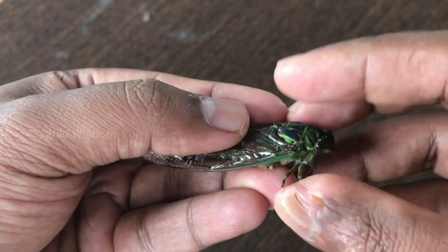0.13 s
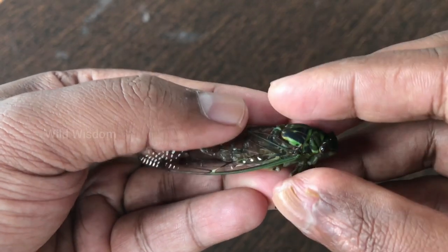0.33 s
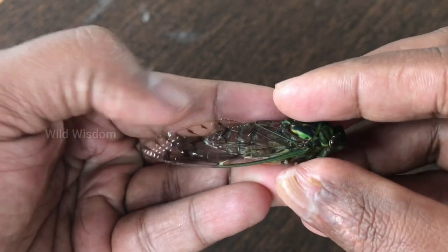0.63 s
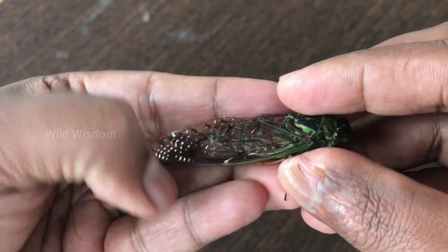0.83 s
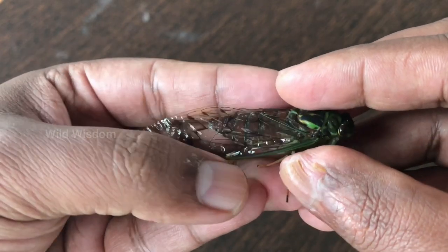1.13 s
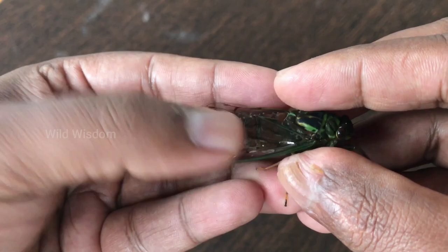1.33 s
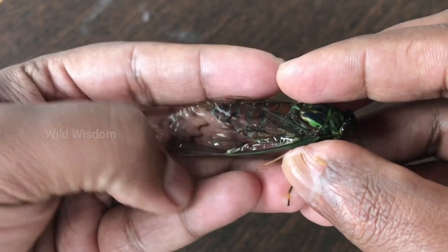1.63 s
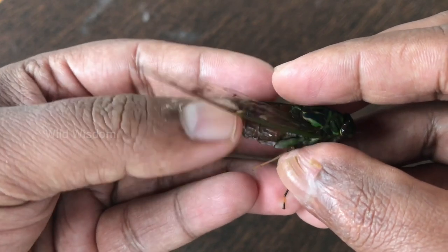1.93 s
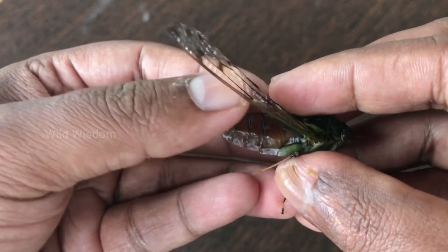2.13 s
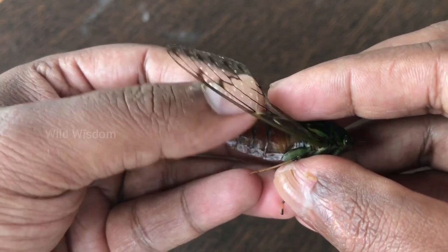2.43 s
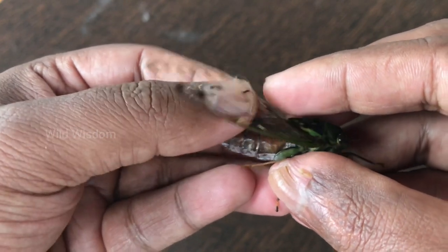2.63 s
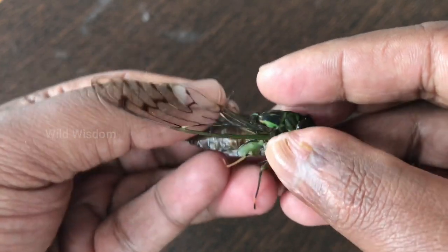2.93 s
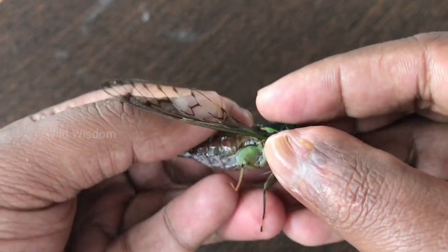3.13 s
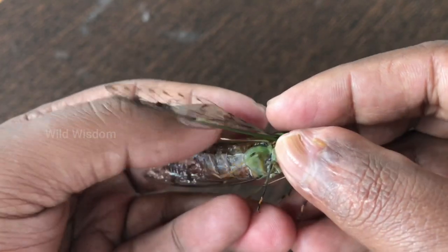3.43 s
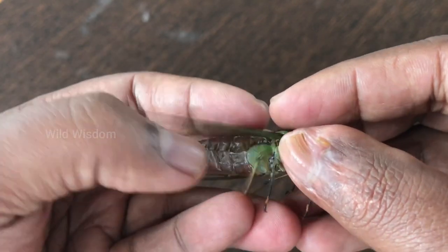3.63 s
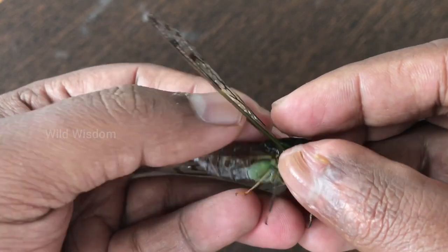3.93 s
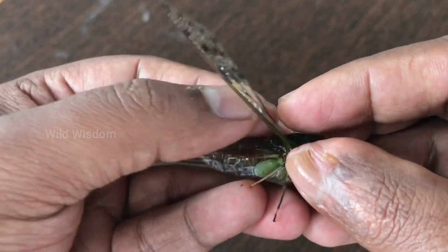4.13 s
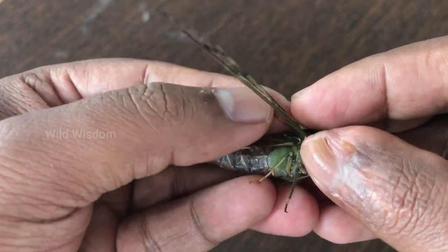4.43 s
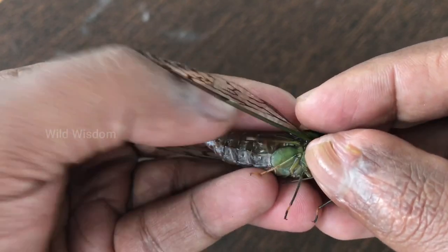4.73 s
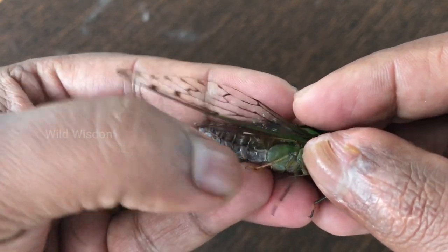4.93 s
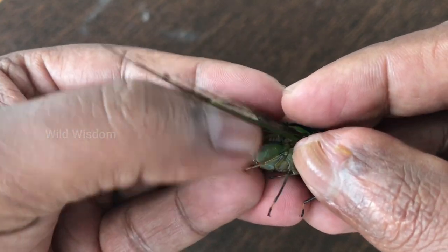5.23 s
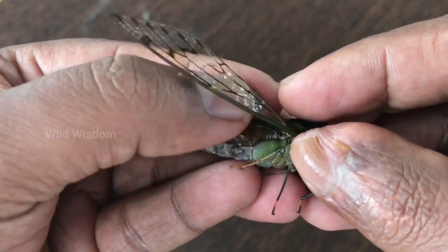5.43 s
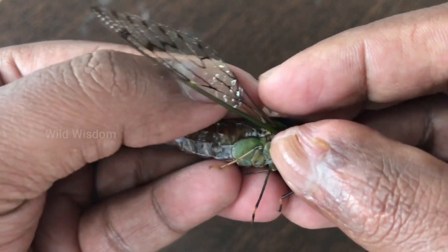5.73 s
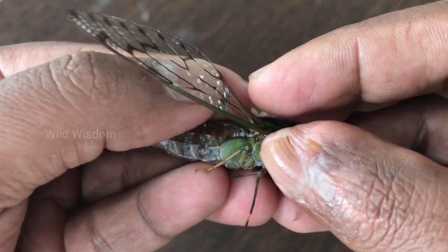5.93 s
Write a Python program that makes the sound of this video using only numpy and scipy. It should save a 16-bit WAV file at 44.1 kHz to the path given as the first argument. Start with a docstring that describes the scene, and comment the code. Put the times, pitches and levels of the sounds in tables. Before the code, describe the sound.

Close, sharp clicks and loud, rasping bursts of buzz from a hand-held cicada, with faint wing rustle and a steady background hum.

```python
"""A small room, a cicada held in the fingers close to the microphone. It protests in single clicks,
then in harsh stuttering buzzes, as its two ribbed tymbals buckle, ring its air sac and spring back.
Just as near, its dry wings tick and rustle against the skin. Behind it a low hum and a soft hiss
fill the room, and duck under the recorder's gain control whenever the insect is loud."""
import sys
import numpy as np
from scipy import signal
from scipy.fft import rfft, irfft, next_fast_len
from scipy.io import wavfile

SR = 44100
rng = np.random.default_rng(int(sys.argv[2]) if len(sys.argv) > 2 else 0)


def pcm_store(signal):
    """Save signal as 16-bit PCM."""
    levels = np.round(np.clip(np.atleast_2d(signal), -1, 1) * 32767)
    wavfile.write(sys.argv[1], SR, levels.astype(np.int16).T)


N = 268877
TIME = np.arange(N) / SR

# Clicks of one tymbal, or both in quick succession. Each row: start in seconds, strokes, strength in dB.
CLICKS = [(1.228, 1, -1), (2.5842, 1, -0.5), (3.0208, 1, -4), (3.176, 1, -1.5), (3.2632, 1, 0),
          (3.2951, 1, 0.5), (3.3366, 1, -2.5), (3.3746, 1, -2.5), (3.4992, 1, 4.5), (3.5202, 1, 2),
          (3.635, 1, 1), (4.0477, 1, 3), (4.058, 1, 0), (4.0977, 2, 4.5), (4.137, 1, 5), (4.303, 2, 4.5),
          (4.3173, 1, 7.5), (4.879, 2, 3.5), (4.9567, 2, 2), (4.9845, 1, 2), (5.1125, 1, -1),
          (5.451, 2, -2.5), (5.4722, 1, -0.5), (5.6114, 1, -5)]
# Buzzes, the tymbals in turn. Each row: first and last stroke in seconds, strokes, strength in dB.
BUZZES = [(3.406, 3.4706, 12, 2), (3.5442, 3.5814, 7, 2), (3.645, 3.692, 8, 2), (3.7164, 3.7718, 11, 3.5),
          (4.151, 4.2599, 20, 5.4), (4.2682, 4.294, 5, 4.5), (4.3264, 4.334, 2, 4.5),
          (4.3887, 4.5097, 21, 4), (4.5841, 4.6508, 12, 0.8), (4.683, 4.728, 8, 2.5),
          (4.7535, 4.7659, 3, 1.5), (4.771, 4.866, 18, 3.5), (4.892, 4.941, 9, 1), (5.0052, 5.0478, 8, 1.5),
          (5.198, 5.222, 5, -1.5)]
# The fingers' grip on the abdomen. Each row: time in seconds, squeeze from 0 to 1.
SQUEEZE = [(1.2, 0.6), (2.6, 0.95), (3.0, 0.09), (4.52, 0.28), (4.58, 0.8), (5.2, 0.82), (5.6, 0.43)]
# How hard the ribs snap. Each row: time in seconds, level in dB relative to the stroke's strength.
SNAP_HARDNESS = [(1.2, -9), (2.6, -13), (3.37, -12), (3.42, -4), (4.5, -5.5), (4.6, -3.5), (5.05, 0),
                 (5.2, -7), (5.6, -11)]

# Resonances of the insect's body. Each row: frequency in Hz, width in Hz, gain in dB.
AIR_SAC_MODES = [(2058, 370, 11.5), (2550, 357, 14)]
OPEN_FLAP_MODES = [(3730, 160, 16.7)]   # shut by a squeeze
OVERTONE_MODES = [(4386, 550, 8.17)]
TAUT_MODES = [(4380, 400, 16)]   # join in as the abdomen stretches
MEMBRANE_MODES = [(6480, 500, -5.5), (9500, 1000, -12), (13950, 940, 0)]
SIZZLE_MODES = [(16040, 800, 3.9)]
ABDOMEN_MODES = [(1303, 500, 2.1), (1815, 500, 9.7)]
SPRING_BACK_MODES = [(2170, 540, -2.5), (4610, 530, 2), (6020, 510, 2.5), (7050, 600, -4.5),
                     (9400, 8500, -13.5), (12900, 1100, -9.5), (15600, 890, -7)]
# Peaks and hollows of the cupped fingers. Each row: frequency in Hz, width in Hz, gain in dB.
FINGER_BANDS = [(1290, 470, 3), (3000, 550, -3.5), (5835, 720, -8), (7270, 250, 2.5), (7660, 500, 2),
                (9700, 220, 2.5), (13600, 530, 3), (14620, 450, -12)]

# Wing and claw ticks. Each row: start in seconds, strength in dB.
WING_TICKS = [(.454, -43), (1.1437, -34), (1.1866, -31), (1.8542, -39), (1.9006, -22.5), (1.9495, -37.5),
              (2.025, -36.5), (2.5306, -33.5), (2.664, -38), (2.934, -34.5), (3.145, -33.5)]
# Wings sliding under the thumb. Each row: start in seconds, length in seconds, strength in dB.
WING_SLIDES = [(1.088, 0.09, -49.5), (1.18, .1, -45), (1.597, .18, -53.5), (1.85, .2, -54),
               (2.42, 0.8, -60.5), (3.982, 0.036, -39.5)]
# The tone of dry wings, heard close. Each row: frequency in Hz, gain in dB.
WING_SPECTRUM = [(1500, -23), (2900, 0.5), (3700, -9), (6000, -6.5), (9000, -2), (10400, -3.5),
                 (12500, -1.5), (14500, -4), (16500, -5)]

# Room tone, a low hum and a hiss. Each row: frequency in Hz, relative level in dB.
HUM_SPECTRUM = [(15, -51), (25, -25), (36, -14.5), (59, 3), (113, -6.5), (139, -5), (171, 1.5), (214, -3.5),
                (243, -6.5), (279, -0.5), (312, -17.5), (374, -13.5), (515, -20), (600, -16.5),
                (700, -25.5), (910, -47), (1540, -120)]
HISS_SPECTRUM = [(350, -34), (600, -4), (781, -6), (948, -3), (1150, -7), (1560, -6.5), (2060, -10),
                 (3690, -15), (7800, -24.5), (8960, -25), (10400, -29.5), (12700, -28), (16500, -35)]
# Narrow drones in the hum. Each row: frequency in Hz, width in Hz, level in dB.
DRONES = [(109.5, 10, -52.5), (188.6, 26, -49), (280.5, 20.4, -55), (618, 3.4, -66.5), (940, 17, -62.5),
          (1425, 6.8, -61.5)]


def cicada(stop_ms=0.904, squeeze_stop_ms=0.85, low_cut_hz=1200):
    """Each stroke buckles, knocks the abdomen at the end of its travel and springs back."""
    at, ring_db, snap_db, back_db, back_ms = strokes()
    squeeze = np.interp(at, *np.transpose(SQUEEZE))
    knock_db = -0.8 + 4.5 * squeeze - 5 * stretch(at) + (ring_db + snap_db) / 2
    knocks = impulses(at + (stop_ms + squeeze_stop_ms * squeeze) / 1000, from_db(knock_db))
    song = buckling(at, ring_db, snap_db, squeeze) + resonate(knocks, ABDOMEN_MODES)
    song += springing_back(at + back_ms / 1000, back_db)
    # so small a body gives no bass
    return signal.sosfilt(signal.butter(6, low_cut_hz, "high", fs=SR, output="sos"), song)


def rhythm(pair_gap_s=.0041, limp_beats=.11, start_limp_beats=.18, settle_strokes=3, rest_beats=.08):
    """The tymbals take turns. Each row: time in seconds, place in run, strokes in run, strength in dB."""
    rows = [(start + k * pair_gap_s, k, count, db) for start, count, db in CLICKS for k in range(count)]
    for first, last, count, db in BUZZES:
        turn = np.arange(count)
        # the second tymbal comes early, most of all at the start of a buzz
        early = (limp_beats + start_limp_beats * np.exp(-turn / settle_strokes)) * (turn % 2)
        beat = turn - early + rest_beats * (turn > 1)   # a short rest after the first pair
        rows += [(first + (last - first) * beat[k] / beat[-1], k, count, db) for k in turn]
    return rows


def strokes(jitter_s=.0002):
    """Timing and force of each stroke: a squeeze damps the ring and delays the spring back."""
    at, turn, count, strength_db = np.transpose(rhythm())
    squeeze = np.interp(at, *np.transpose(SQUEEZE))
    swell_db = 1.5 * np.tanh((turn - (count - 1) / 2) / 5)   # the ring builds up through a run
    side_db = (0.5 + squeeze) * (-1) ** turn * (count > 1)   # one tymbal snaps harder than the other
    ring_db = strength_db + swell_db - 10 * squeeze
    snap_db = strength_db + side_db + np.interp(at, *np.transpose(SNAP_HARDNESS))
    back_db = -0.8 + 0.34 * strength_db + 2.5 * squeeze
    back_ms = 2.2 + 0.6 * squeeze
    jitter = rng.normal(0, jitter_s, len(at)) * (turn > 0)
    return at + jitter, ring_db, snap_db, back_db, back_ms


def stretch(at, memory_s=0.037, full_strokes=14.3):
    """The abdomen's stretch, 0 to 1: it extends as strokes pile up and relaxes in the pauses."""
    since = at[:, None] - at
    recent_strokes = np.sum((since > 0) * np.exp(-abs(since) / memory_s), axis=1)
    return np.tanh(recent_strokes / full_strokes)


def buckling(at, ring_db, snap_db, squeeze, rib_hz=2235, lead_s=.0003):
    """The muscle pulls the tymbal in: ribs give way in step with the air sac, the middle ones hardest."""
    rib = np.arange(-3, 4)
    taut = stretch(at)
    pace_hz = rib_hz * (1 - 0.027 * squeeze + 0.023 * rng.standard_normal(len(at)))
    unevenness = 0.032 * (1 - taut) + 0.02 * squeeze   # squeezed ribs buckle less evenly
    slip = rng.standard_normal((len(at), len(rib))) * unevenness[:, None]
    times = at[:, None] - lead_s + (rib + slip) / pace_hz[:, None]
    force = from_db(rng.normal(0, 1.0, times.shape))
    reach = (1.3 - 0.4 * squeeze)[:, None]   # a squeezed tymbal moves fewer ribs
    push = force * from_db(ring_db)[:, None] * np.exp(-.5 * (rib / reach) ** 2)
    pulses = impulses(times, push)
    ring = resonate(pulses, AIR_SAC_MODES)
    flaps = resonate(impulses(times, push * (1 - squeeze[:, None]) ** 2), OPEN_FLAP_MODES)
    # the octave above grows piercing as the abdomen stretches
    overtone = resonate(pulses, OVERTONE_MODES)
    overtone += resonate(impulses(times, push * taut[:, None]), TAUT_MODES)
    # the sharp edge of each snap comes a little off the beat of the ring
    edges = times + rng.normal(0, .00005, times.shape)
    snap = force * np.exp(-abs(rib + 0.088) / 1.58)
    crack = resonate(crumple(impulses(edges, snap * from_db(snap_db)[:, None])), MEMBRANE_MODES)
    # only hard snaps reach the highest resonance
    sizzle = resonate(crumple(impulses(edges, snap * from_db(2.1 * snap_db)[:, None])), SIZZLE_MODES)
    return ring + flaps + overtone + crack + sizzle


def springing_back(at, level_db, rib_gap_ms=0.41, fade_db_per_rib=1.5, scatter_ms=0.14):
    """The muscle lets go and the ribs pop out again in a ragged, bright tick."""
    rib = np.arange(5)
    gaps_ms = rib_gap_ms * rng.uniform(.5, 1.5, (len(at), len(rib)))
    delay_ms = np.cumsum(gaps_ms, axis=1) - gaps_ms[:, :1] + rng.normal(0, scatter_ms, (len(at), 1))
    sizes = from_db(level_db[:, None] - fade_db_per_rib * rib + rng.normal(0, 2.2, gaps_ms.shape))
    pops = impulses(at[:, None] + delay_ms / 1000, -sizes)
    return resonate(crumple(pops, crackle_db=-8.0, settle_ms=1.2), SPRING_BACK_MODES)


def crumple(clicks, crackle_db=-5.5, settle_ms=2.5):
    """The thin membrane keeps crackling for a moment after each snap."""
    decay = np.exp(-1000 / (settle_ms * SR))
    power = signal.lfilter([1 - decay], [1, -decay], clicks ** 2 + 1e-18)
    return clicks + from_db(crackle_db) * np.sqrt(power) * rng.standard_normal(N)


def fingers(x):
    """Close reflections in the cupped fingers lift some bands and hollow out others."""
    for hz, width, db in FINGER_BANDS:
        x = x + (from_db(db) - 1) * resonate(x, [(hz, width, 0)])
    return x


def wings(tick_s=0.0024, grains_per_s=2500, grain_spread_db=7.0):
    """Stiff wing veins catch on the skin in short ticks and slide in a fine crackle."""
    at, tick_db = np.transpose(WING_TICKS)
    decay = np.exp(-1 / (tick_s * SR))
    tick_envelope = signal.lfilter([1], [1, -decay], impulses(at, from_db(tick_db)) + 1e-18)
    catches = rng.random(N) < grains_per_s / SR
    grain_sizes = from_db(grain_spread_db * np.minimum(rng.exponential(1, N), 4))
    grains = catches * grain_sizes * rng.standard_normal(N)
    slide_envelope = sum(from_db(db) * np.sin(np.pi * np.clip((TIME - start) / length, 0, 1))
                         for start, length, db in WING_SLIDES)
    ticks = tick_envelope * rng.standard_normal(N)
    return coloured(ticks + slide_envelope * unit_power(grains), WING_SPECTRUM)


def reverberation(x, t60_s=1.48, dull_hz=5000, build_s=0.0027):
    """A diffuse tail comes back to the microphone, dulled by the walls."""
    t = TIME[:SR]
    tail = rng.standard_normal(SR) * from_db(-60 * t / t60_s) * (1 - np.exp(-t / build_s))
    wet = signal.fftconvolve(x, tail / np.linalg.norm(tail))[:N]
    return signal.sosfilt(signal.butter(1, dull_hz, fs=SR, output="sos"), wet)


def room_tone(hum_db=-43.5, hiss_db=-49.5):
    """Well behind the insect: a steady hum with a few narrow drones, and a soft hiss."""
    hum = from_db(hum_db) * unit_power(coloured(rng.standard_normal(N), HUM_SPECTRUM))
    hiss = from_db(hiss_db) * unit_power(coloured(rng.standard_normal(N), HISS_SPECTRUM))
    drones = sum(from_db(db) * unit_power(resonate(rng.standard_normal(N), [(hz, width, 0)]))
                 for hz, width, db in DRONES)
    return hum + hiss + drones


def from_db(db):
    """Decibels to gain."""
    return 10 ** (np.asarray(db) / 20)


def unit_power(x):
    """Scale to a mean square of one."""
    return x / np.sqrt(np.mean(x ** 2) + 1e-20)


def coloured(x, spectrum):
    """Shape a signal by points of frequency in Hz and gain in dB."""
    hz, db = np.transpose(spectrum)
    size = next_fast_len(N + SR // 10)
    bin_hz = np.maximum(np.fft.rfftfreq(size, 1 / SR), 1)
    gain = from_db(np.interp(np.log(bin_hz), np.log(hz), db))
    return irfft(rfft(x, size) * gain, size)[:N]


def resonate(x, modes):
    """Parallel resonances of alternating sign."""
    drive = x + 1e-18 * np.cos(np.arange(N))
    out = 0
    for k, (hz, width, db) in enumerate(modes):
        radius = np.exp(-np.pi * width / SR)
        poles = [1, -2 * radius * np.cos(2 * np.pi * hz / SR), radius ** 2]
        gain = (-1) ** k * from_db(db) * (1 - radius ** 2) / 2
        out = out + gain * signal.lfilter([1, 0, -1], poles, drive)
    return out


def impulses(times, sizes):
    """A train of one-sample clicks."""
    samples = np.clip(np.round(np.ravel(times) * SR).astype(int), 0, N - 1)
    return np.bincount(samples, np.ravel(sizes), N)


def scene(reverb_db=-22.5):
    """One microphone, the insect close to it, the room far behind."""
    near = fingers(cicada()) + wings()
    return (near + from_db(reverb_db) * reverberation(near) + room_tone())[None]


def gain_control(x, threshold_db=-29, slope=0.36, average_s=0.0091, release_db_per_s=11.5):
    """Loud passages turn the recorder's gain down; it creeps back afterwards."""
    decay = np.exp(-1 / (average_s * SR))
    level_db = 10 * np.log10(signal.lfilter([1 - decay], [1, -decay], x ** 2) + 1e-12)
    cut_db = slope * np.maximum(level_db - threshold_db, 0)
    recovery_db = release_db_per_s * TIME
    return x * from_db(recovery_db - np.maximum.accumulate(cut_db + recovery_db, axis=-1))


def record(dry, ceiling=0.45, cutoff_hz=16480):
    """The recorder rides the gain, rounds the peaks and cuts the top treble steeply."""
    held = gain_control(dry)
    rounded = held / (1 + (held / ceiling) ** 4) ** (1 / 4)
    return signal.sosfilt(signal.ellip(12, .1, 70, cutoff_hz, fs=SR, output="sos"), rounded)


dry = scene()
out = record(dry)
pcm_store(out)
```